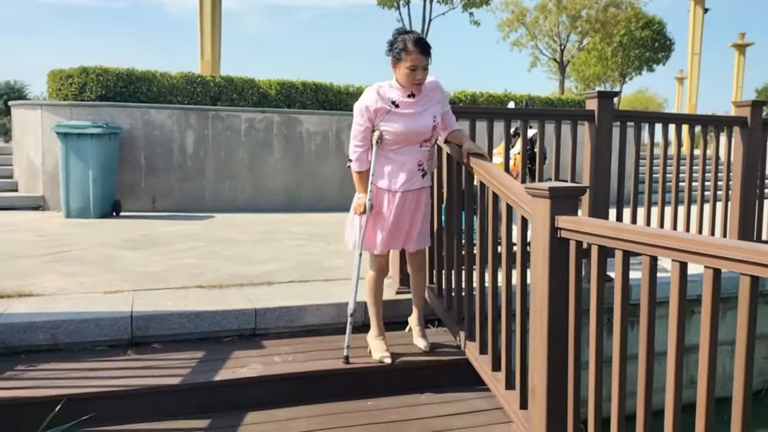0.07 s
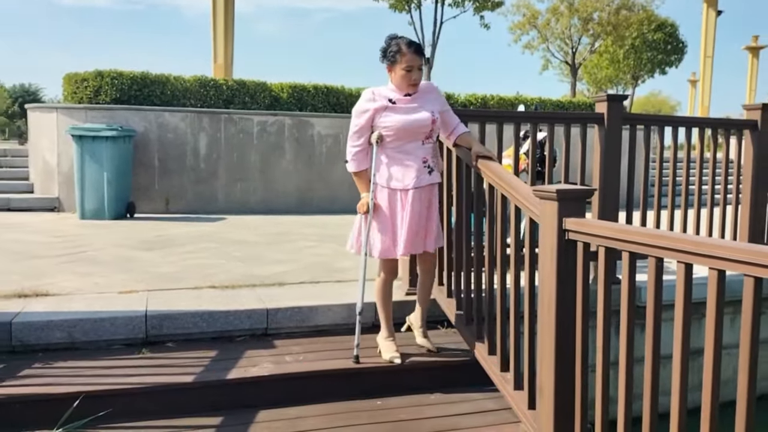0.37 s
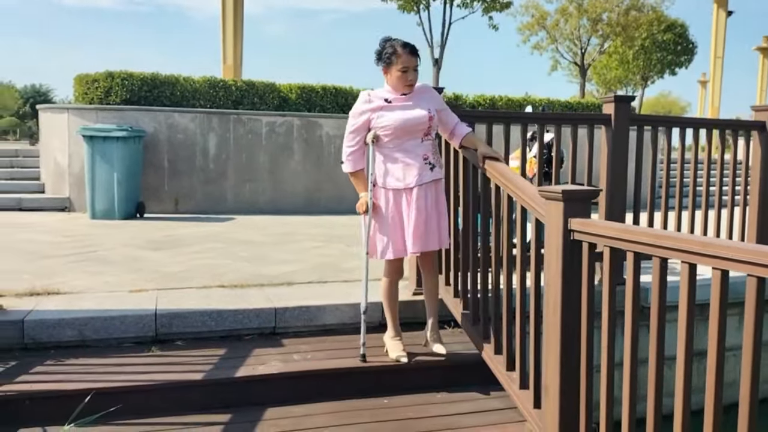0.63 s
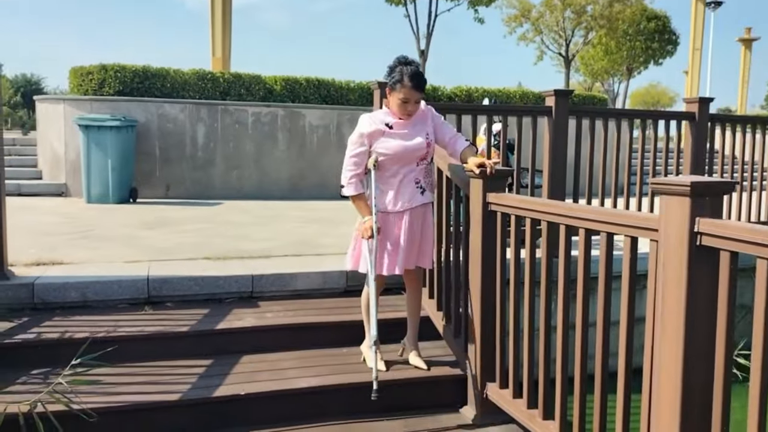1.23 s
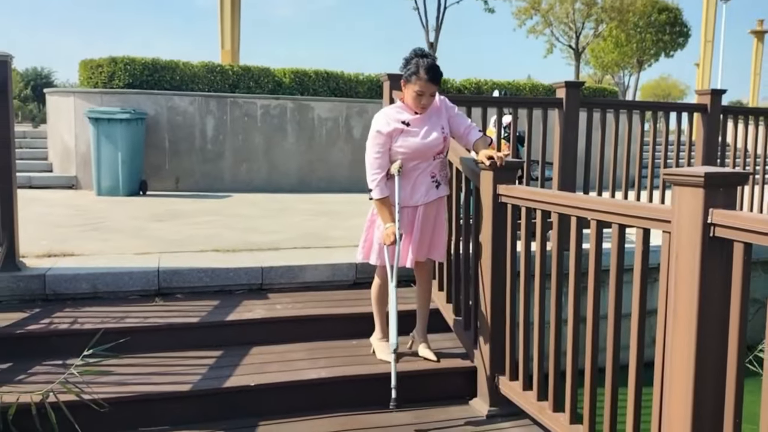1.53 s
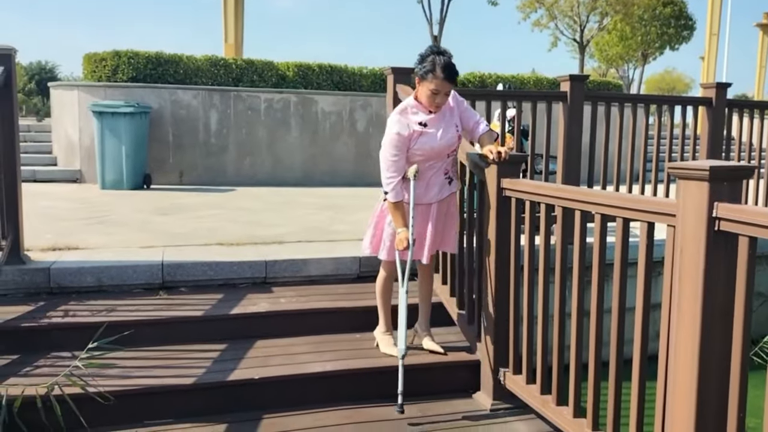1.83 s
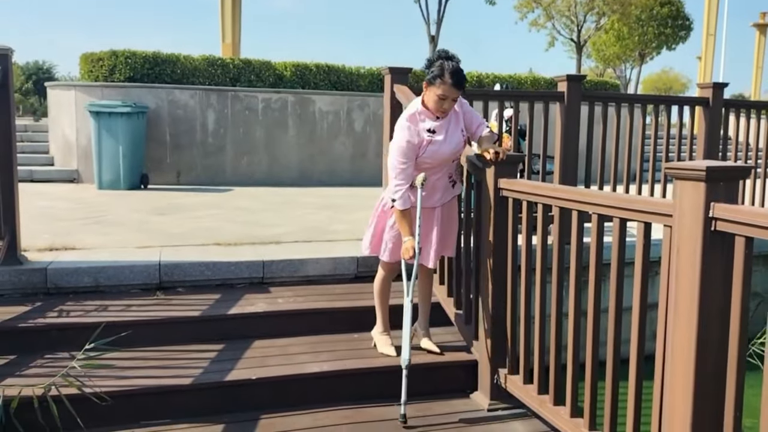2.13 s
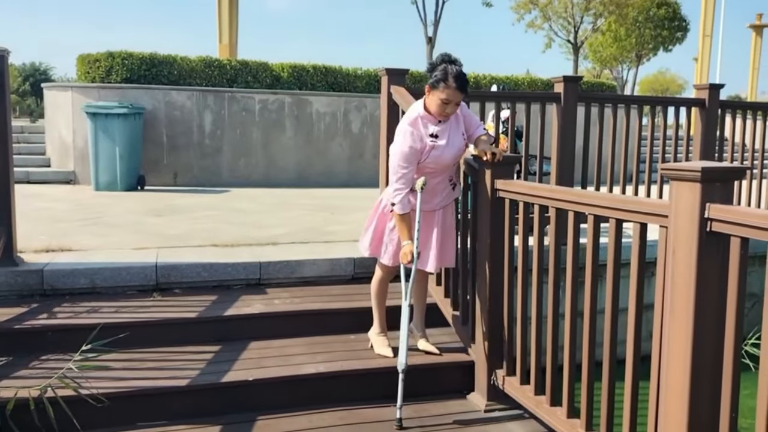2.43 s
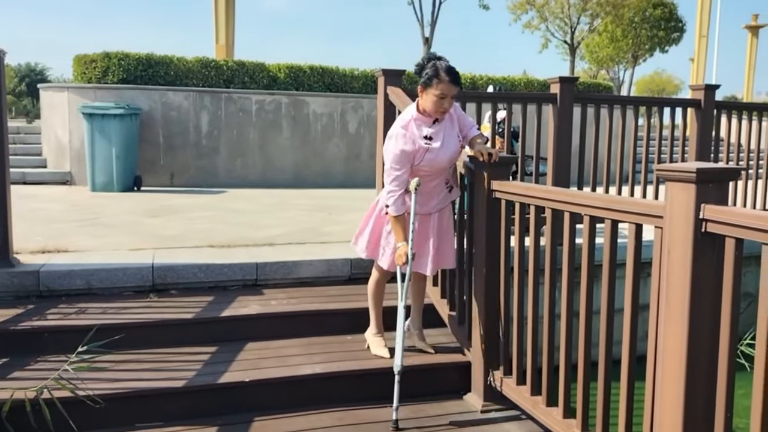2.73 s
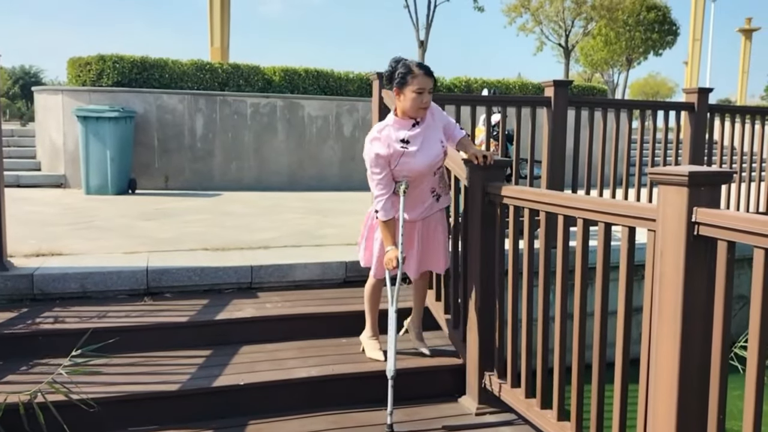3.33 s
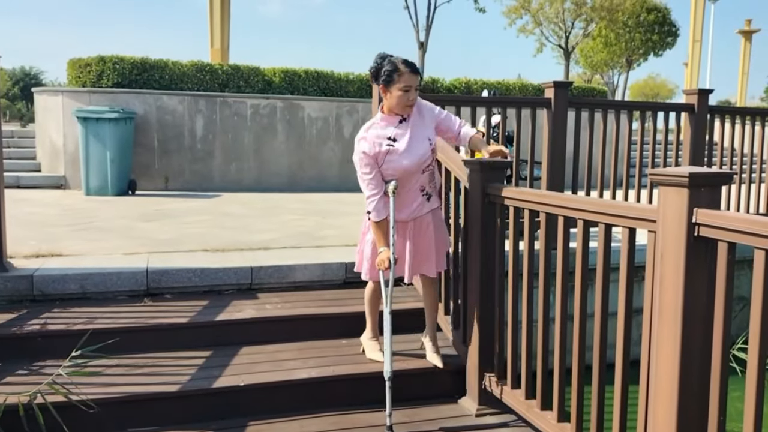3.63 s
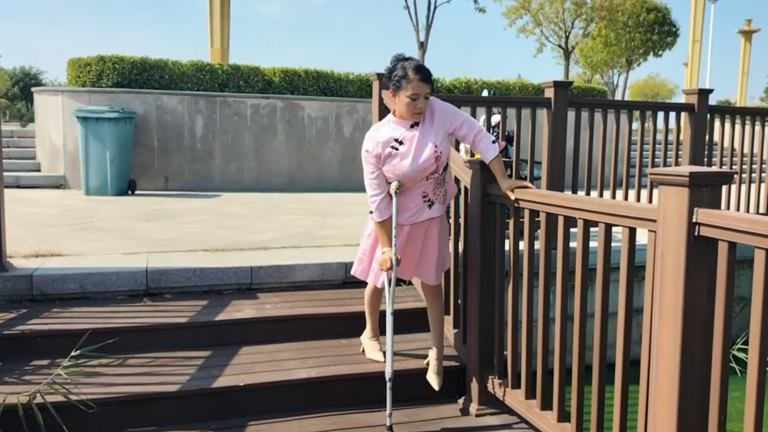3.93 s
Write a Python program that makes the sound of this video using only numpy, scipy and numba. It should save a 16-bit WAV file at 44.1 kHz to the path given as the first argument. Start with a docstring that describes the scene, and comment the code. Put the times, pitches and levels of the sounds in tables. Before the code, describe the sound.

Hard, regular knocks from a crutch tip and heels sound five times on outdoor wooden steps, after a soft heel tap. Gusts rumble on the microphone and strengthen over a faint hiss, with one metallic click before the last knock.

```python
"""Outdoors on wooden steps, over a faint murmur and a high hiss, wind buffets the microphone in gusts.
At 0.5 s a heel taps a plank and sets its modes ringing. From 1.3 s come five hard, evenly paced knocks
on wood, each scattered by the railings and echoed by a wall. The gusts grow stronger, thin tones rise
in the hiss, and just before the last knock a metal crutch gives its one clear click."""
import sys
import numpy as np
from scipy import signal
from scipy.fft import rfft, irfft
from scipy.io import wavfile
from scipy.ndimage import uniform_filter1d
from numba import njit

SR = 44100
rng = np.random.default_rng(int(sys.argv[2]) if len(sys.argv) > 2 else 0)


def log_audio(samples):
    """Write samples as a 16-bit WAV file to the path given in sys.argv[1]."""
    # one column per channel
    frames = np.atleast_2d(samples).T
    # limit to full scale, then quantise
    limited = np.clip(frames, -1, 1)
    pcm = np.round(limited * 32767).astype(np.int16)
    wavfile.write(sys.argv[1], SR, pcm)


N = 176400
T = np.arange(N) / SR


def undb(db):
    """Decibels to amplitude ratio."""
    return 10 ** (np.asarray(db) / 20)


def unit(x):
    """Normalisation to an rms of 1."""
    return x / np.sqrt(np.mean(x ** 2))


def add(out, at_s, x):
    """Superposition of x on out from a given time."""
    i = max(int(at_s * SR), 0)
    out[i:i + len(x)] += x[:N - i]


def cut(x, hz, kind, order):
    """Butterworth low-pass or high-pass filtering."""
    return signal.sosfilt(signal.butter(order, hz, kind, fs=SR, output="sos"), x)


@njit
def moving_lowpass(x, edge_hz):
    """State-variable filtering: two integrators form a low-pass with a moving edge."""
    y, band_state, low_state = np.empty(len(x)), 0., 0.
    for i in range(len(x)):
        gain = np.tan(np.pi * edge_hz[i] / SR)
        band = (band_state + gain * (x[i] - low_state)) / (1 + gain * (gain + 1.4))
        y[i] = low_state + gain * band
        band_state, low_state = 2 * band - band_state, 2 * y[i] - low_state
    return y


def noise(spectrum):
    """Spectral shaping of white noise by (Hz, dB) points, at an rms of 1."""
    hz, db = np.array(spectrum).T
    bins_hz = np.maximum(np.fft.rfftfreq(N, 1 / SR), 1)
    gain = undb(np.interp(np.log(bins_hz), np.log(hz), db))
    return unit(irfft(rfft(rng.standard_normal(N)) * gain, N))


def ring(t, hz, t60):
    """Free vibration of a damped mode, falling 60 dB in t60 seconds."""
    return np.sin(2 * np.pi * hz * t) * np.exp(-np.log(1000) * t / t60)


def ring_modes(t, modes):
    """Modal superposition: damped modes add with alternating signs."""
    return sum((-1) ** k * undb(db) * ring(t, hz, t60) for k, (hz, db, t60) in enumerate(modes))


def smear(x, reflections):
    """Convolution with a train of reflections, keeping the energy of x."""
    return unit(signal.fftconvolve(x, reflections)[:len(x)]) * np.std(x)


KNOCK_DB, CONTACT_S = -29, 0.0002
BENDING_LAG_S, SCATTER_DB, SCATTER_T60_S = 0.00306, 2, 0.44  # all at 1 kHz
SCATTER_RISE_S, SCATTER_DB_PER_OCTAVE, ECHO_SPREAD_S = 0.0033, -4.5, 0.0044
# Modes of the wood. Each row: frequency in Hz, relative level in dB, t60 in seconds.
WOOD_MODES = [(295.5, -19.5, 0.028), (512, -15, 0.013), (751, -6.5, 0.017), (956, -13.5, 0.044),
              (1245, -8.5, 0.031), (1398, -13.5, .05), (1526, -9.5, .028), (1738, -4.5, 0.017),
              (2196, -0.5, 0.012), (2627, 1, 0.013), (2727, -13, .015), (3006, -1.5, 0.011),
              (3533, -15, 0.019)]
# Each entry: a frequency in Hz at which one of the striking spot's gains applies.
SPOT_BANDS_HZ = [930, 1300, 1690, 2120, 2620, 2980, 3500]
# Echoes off railings and walls. Each row: delay in seconds, gain in dB.
ECHO_PATHS = [(0.019, -19), (.033, -26), (0.051, -11), (.063, -19.5)]
# Blows, each on a spot that favours its own modes. Each row: start in seconds, relative level in dB,
# gains of the low, middle, high and top modes in dB, pitch ratio.
BLOWS = [(1.270, 3.5, -4.5, -6, -10, -2, 0.96), (1.895, -3, 4.5, 1.5, 7, 4.5, 0.98),
         (2.522, -1.5, 5, -2, 4, 6, 0.98), (3.149, -4.5, 9.5, 6.5, 3.5, 14, 0.986),
         (3.780, -2.5, 9, 4.5, 6, 16, 1.0)]


def knocks():
    """Dispersion of bending waves brings the treble first; railings scatter it all and walls echo it."""
    out, t = np.zeros(N), T[:SR // 2]
    for at, db, low, middle, high, top, pitch in BLOWS:
        signs, sizes, wall = rng.standard_normal((3, len(t)))
        strengths = signs * np.exp(0.55 * sizes)  # single reflections are uneven
        reflections = strengths * (1 - np.exp(-t / SCATTER_RISE_S))
        direct, tail = np.zeros((2, len(t)))
        for k, (hz, mode_db, t60) in enumerate(WOOD_MODES):
            spot_db = np.interp(hz, SPOT_BANDS_HZ, [low, middle, middle, 0, high, high, top])
            khz = hz / 1000
            since = np.maximum(t - BENDING_LAG_S / np.sqrt(khz), 0)
            onset = 1 - np.exp(-since / CONTACT_S)
            mode = (-1) ** k * undb(mode_db + spot_db) * ring(since, hz * pitch, t60) * onset
            direct += mode
            fade = np.exp(-np.log(1000) * t * khz ** 0.55 / SCATTER_T60_S)  # treble dies sooner
            tail_db = SCATTER_DB + SCATTER_DB_PER_OCTAVE * np.log2(khz)
            tail += undb(tail_db) * smear(mode, fade * reflections)
        add(out, at, undb(db) * (direct + tail))
        # A rough wall smears part of each echo.
        echo = direct + undb(-2) * smear(direct, wall * np.exp(-t / ECHO_SPREAD_S))
        for delay, echo_db in ECHO_PATHS:
            add(out, at + delay, undb(db + echo_db) * echo)
    return undb(KNOCK_DB) * cut(out, hz=3830, kind="low", order=6)


GUST_ATTACK_S, GUST_RELEASE_S, STEADY_S = 0.0062, 0.011, 0.04
EDDY_HZ, EDDY_DB_PER_OCTAVE = 250.4, 20  # filter edge for a -30 dB gust, and the rise that doubles it
PORT_HZ = 113  # lower edge of the rumble
# Gusts of wind. Each row: start in seconds, length in seconds, level in dB.
WIND_GUSTS = [(0, 0.072, -48.5), (0.309, 0.053, -34.5), (0.431, 0.073, -52), (0.585, .04, -57.5),
              (0.733, 0.034, -55.5), (0.919, 0.017, -46.5), (1.018, 0.098, -39), (1.136, 0.053, -35.5),
              (1.233, 0.054, -33.5), (1.294, 0.015, -37.5), (1.357, 0.075, -39.5), (1.428, .22, -52.5),
              (1.577, 0.013, -44), (2.078, 0.051, -58), (2.256, .13, -54), (2.448, 0.03, -46.5),
              (2.597, 0.079, -36.5), (2.691, 0.037, -26.5), (2.741, 0.036, -26), (2.827, 0.091, -34.5),
              (2.938, 0.034, -26), (2.977, 0.17, -44.5), (3.088, 0.044, -27), (3.15, 0.038, -34),
              (3.208, 0.056, -27), (3.28, 0.055, -35.5), (3.335, 0.045, -28.5), (3.38, 0.17, -44),
              (3.477, 0.22, -33), (3.645, 0.13, -21.5), (3.79, 0.14, -35), (3.893, 0.066, -30),
              (3.937, .04, -42)]


def gusts():
    """Turbulence at the microphone port: the harder the gust, the higher its rumble reaches."""
    power = np.full(N, undb(-140))
    for start, length, db in WIND_GUSTS:
        before = np.maximum(start - T, 0) / GUST_ATTACK_S
        after = np.maximum(T - start - length, 0) / GUST_RELEASE_S
        power += (undb(db) * np.exp(-before - after)) ** 2
    octaves = (10 * np.log10(power) + 30) / EDDY_DB_PER_OCTAVE
    edge_hz = np.clip(EDDY_HZ * 2 ** octaves, 120, 900)
    flow = cut(rng.standard_normal(N), PORT_HZ, "high", order=2)
    for _ in range(3):
        flow = moving_lowpass(flow, edge_hz)
    # Dividing by the running rms lets each gust hold its force.
    envelope = np.abs(signal.hilbert(flow))
    running_rms = np.sqrt(uniform_filter1d(envelope ** 2, int(STEADY_S * SR)) / 2)
    return flow / running_rms * np.sqrt(power)


# Single eddies. Each row: centre in seconds, level in dB, frequency in Hz, Gaussian width in seconds.
EDDIES = [(0.217, -35, 150, 0.0017), (0.33, -32.5, 390, 0.00096), (.338, -26.5, 137, 0.0046),
          (.357, -17, 206, 0.0012), (0.839, -28.5, 139, 0.0038), (0.924, -36, 117, 0.0051),
          (.990, -32, 172, .0017), (1.073, -30.5, 121, 0.016), (1.177, -21, 140, 0.0027),
          (1.274, -16.5, 140, 0.0019), (1.399, -22.5, 131, 0.0035), (1.593, -36.5, 114, 0.0093),
          (2.610, -20, 193, 0.0011), (2.64, -23, 274, 0.0024), (2.665, -19.5, 155, 0.0018),
          (2.700, -25, 150, 0.0075), (2.715, -21, 130, 0.0054), (2.746, -26.5, 257, 0.0022),
          (2.7515, -12, 240, 0.00071), (2.782, -26, 334, 0.0016), (2.808, -24, 260, 0.0026),
          (2.818, -18, 235, 0.0013), (2.870, -13.5, 227, 0.001), (2.958, -21.5, 161, 0.0048),
          (3.095, -11.5, 370, 0.00057), (3.246, -8.5, 208, 0.0016), (3.248, -24.5, 435, 0.0019),
          (3.336, -14.5, 160, 0.0037), (3.352, -12.5, 228, 0.0028), (3.354, -26.5, 406, 0.0021),
          (3.372, -23.5, 257, .004), (3.500, -13, 152, 0.0024), (3.583, -14.5, 145, 0.0017),
          (3.653, -9, 260, 0.00076), (3.688, -13.5, 140, 0.0022), (3.736, -24.5, 190, 0.0026),
          (3.758, -13, 186, 0.0014), (3.854, -11.5, 143, 0.0013)]


def thumps():
    """An eddy crossing the port makes a wave packet: a few smooth swings of pressure."""
    out = np.zeros(N)
    for at, db, hz, width in EDDIES:
        envelope = np.exp(-((T - at) / width) ** 2 / 2)
        out -= undb(db) * np.sin(2 * np.pi * hz * (T - at)) * envelope
    return cut(out, PORT_HZ / 2, "high", order=2)


HEEL_AT_S, HEEL_DB, HEEL_SCATTER_S = 0.508, -43.5, 0.033
# Modes of the plank. Each row: frequency in Hz, relative level in dB, t60 in seconds.
PLANK_MODES = [(266.4, -7.5, 0.27), (492, -0.5, 0.079), (785, -3, .04), (980, -9.5, .04),
               (1405, -2.5, 0.11), (1760, -3.5, 0.067), (2360, -7.5, 0.015), (2770, 0, 0.021)]


def heel():
    """Impulse excitation: a light heel tap rings a plank, and the steps scatter the sound."""
    out, t = np.zeros(N), T[:SR // 2]
    plank = ring_modes(t, PLANK_MODES)
    reflections = rng.standard_normal(len(t)) * np.exp(-t / HEEL_SCATTER_S)
    tail = undb(-0.5) * smear(plank, reflections)
    add(out, HEEL_AT_S, undb(HEEL_DB) * (plank + tail))
    return out


RASP_DB, RASP_DECAY_S = -1, 0.014
# Modes of the crutch. Each row: frequency in Hz, relative level in dB, t60 in seconds.
TUBE_MODES = [(1042, 0, 0.05), (1480, -10, 0.21), (2330, 3.5, 0.047), (2520, -5, .035), (4700, -34, 0.059),
              (5500, -23, 0.038), (6110, -8, .035), (7340, -2, 0.031), (7270, -19, 0.027)]
# One clear click and two faint ones. Each row: start in seconds, gain in dB.
TUBE_CLICKS = [(2.203, -60.5), (3.692, -37), (3.738, -49)]


def crutch():
    """Play in the metal tube gives a brief rasp and excites its inharmonic resonances."""
    out, t = np.zeros(N), T[:SR // 4]
    tube = ring_modes(t, TUBE_MODES)
    for at, db in TUBE_CLICKS:
        rasp = rng.standard_normal(len(t)) * np.exp(-t / RASP_DECAY_S)
        add(out, at, undb(db) * (tube + undb(RASP_DB) * rasp))
    return cut(out, hz=6500, kind="low", order=6)


MURMUR_DB = -58.5
# Spectrum of the murmur. Each row: frequency in Hz, relative level in dB.
MURMUR_SPECTRUM = [(25, -30.5), (70, 4.5), (120, -5), (320, -8.5), (550, -9), (800, -9), (1100, -9.5),
                   (1550, -18.5), (2000, -25.5), (2800, -19), (4100, -17.5), (5600, -23.5), (7200, -32.5),
                   (9400, -40.5), (12000, -47), (15500, -54.5)]


def murmur():
    """Stationary noise, strongest in the bass, is heard as a far outdoor murmur."""
    return undb(MURMUR_DB) * noise(MURMUR_SPECTRUM)


# Spectrum of the hiss. Each row: frequency in Hz, relative level in dB.
HISS_SPECTRUM = [(2000, -15), (3300, -16), (3700, -5), (4400, -8), (5200, -11), (5900, -12), (7200, -24),
                 (9400, -32), (10800, -47), (12000, -35), (13000, -44.5), (15500, -53.5)]
# Swell of the hiss. Each row: time in seconds, level in dB.
HISS_SWELL = [(0, -61.5), (.15, -65.5), (.9, -66), (1.2, -61), (1.8, -66), (2.5, -66.5), (2.8, -60),
              (3.27, -59.5), (3.6, -58.5), (4, -58.5)]


def hiss():
    """Slow amplitude modulation makes a high band of noise sink and swell."""
    times, db = np.array(HISS_SWELL).T
    return undb(np.interp(T, times, db)) * noise(HISS_SPECTRUM)


# Tones in the hiss. Each row: frequency in Hz, rms deviation in Hz, peak level in dB,
# time of the peak in seconds, Gaussian width in seconds.
HISS_TONES = [(3730, 44, -79, 3.5, .5), (4330, 32, -66, 3.7, 1), (4890, 28, -58.5, 3.3, .14)]


def thin_tones():
    """Random frequency modulation makes each tone waver as it swells and fades."""
    out = np.zeros(N)
    for hz, deviation_hz, db, at, width in HISS_TONES:
        waver_hz = deviation_hz * unit(cut(rng.standard_normal(N), 2 * deviation_hz, "low", order=2))
        phase = 2 * np.pi * np.cumsum(hz + waver_hz) / SR
        envelope = np.exp(-((T - at) / width) ** 2 / 2)
        out += undb(db) * np.sin(phase) * envelope
    return out


def scene():
    """Linear superposition: the pressures of all sources add at one microphone."""
    return (heel() + knocks() + gusts() + thumps() + crutch() + murmur() + hiss() + thin_tones())[None]


def record(dry):
    """Band limiting: the recorder's steep low-pass cuts the treble above 15.7 kHz."""
    return signal.sosfilt(signal.ellip(8, .2, 70, 15700, fs=SR, output="sos"), dry)


dry = scene()
out = record(dry)
log_audio(out)
```